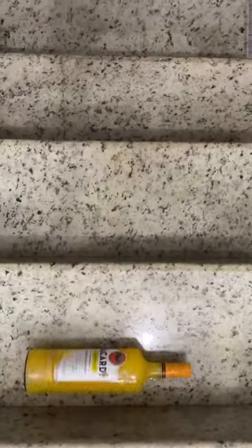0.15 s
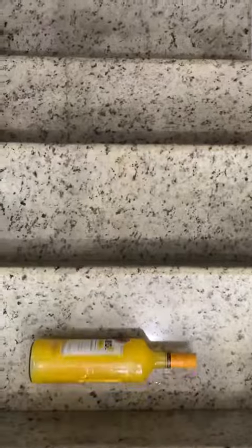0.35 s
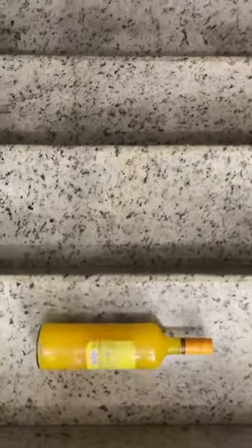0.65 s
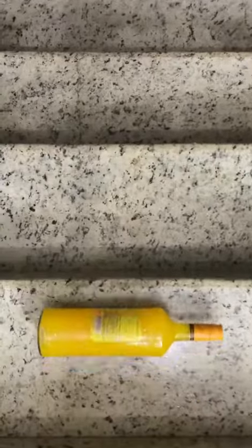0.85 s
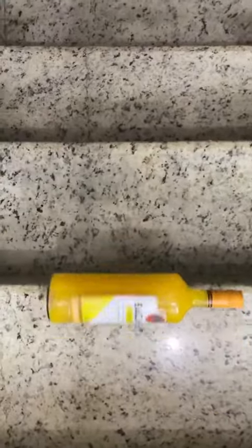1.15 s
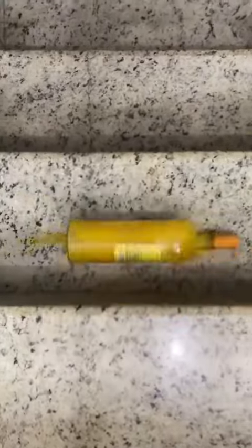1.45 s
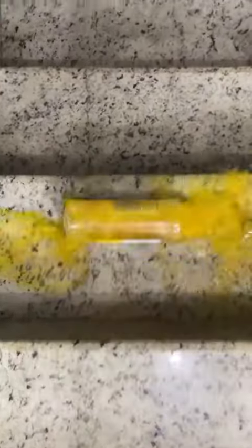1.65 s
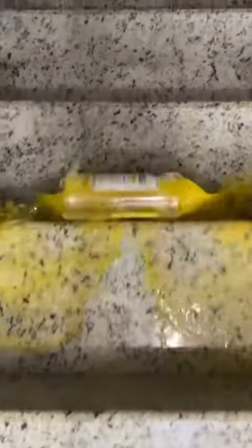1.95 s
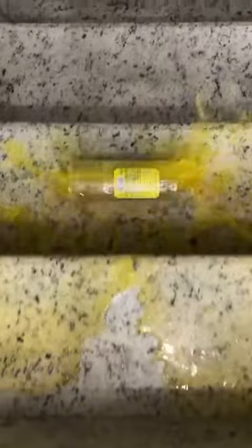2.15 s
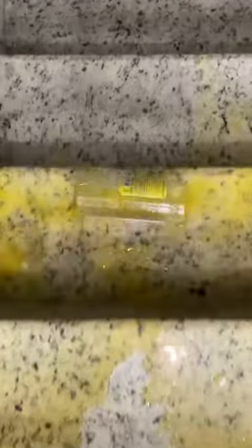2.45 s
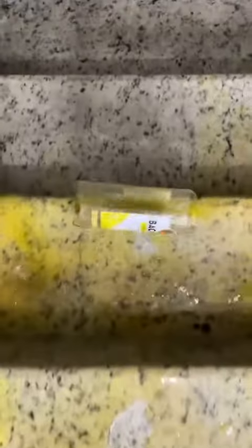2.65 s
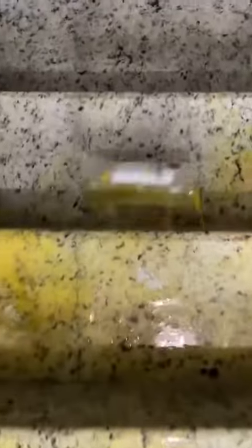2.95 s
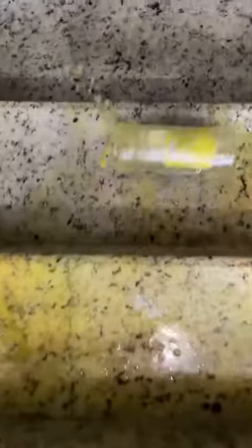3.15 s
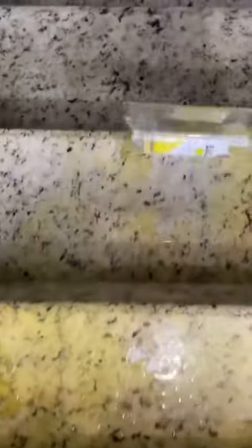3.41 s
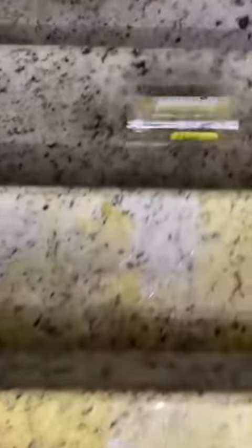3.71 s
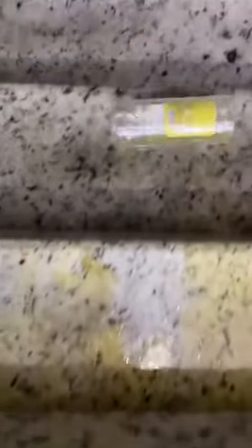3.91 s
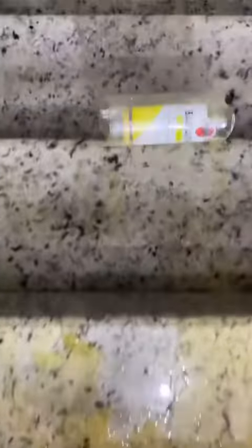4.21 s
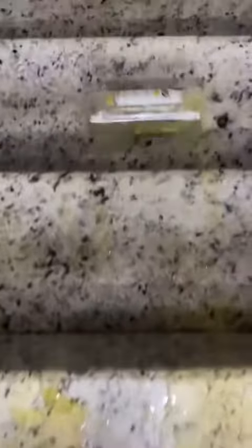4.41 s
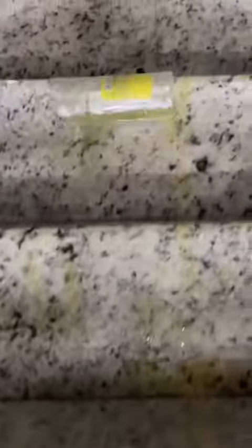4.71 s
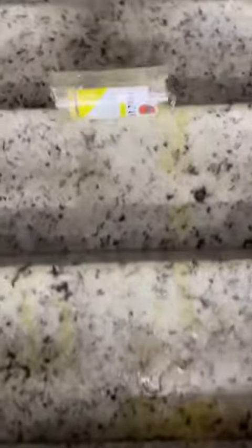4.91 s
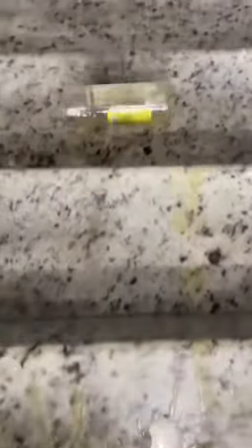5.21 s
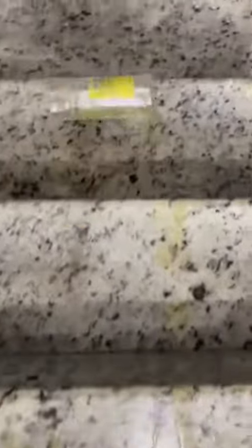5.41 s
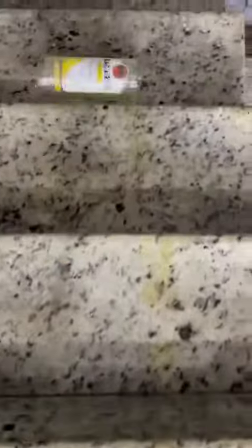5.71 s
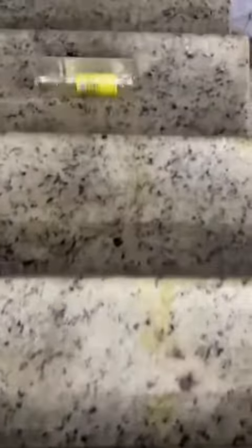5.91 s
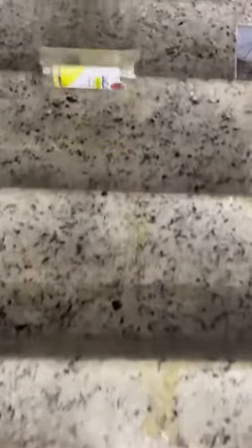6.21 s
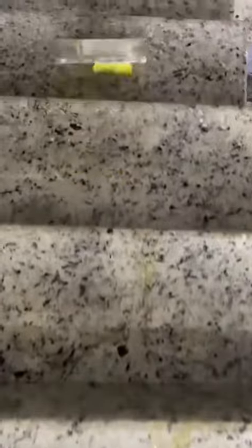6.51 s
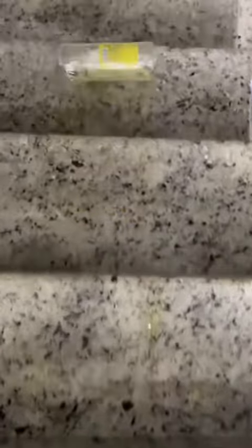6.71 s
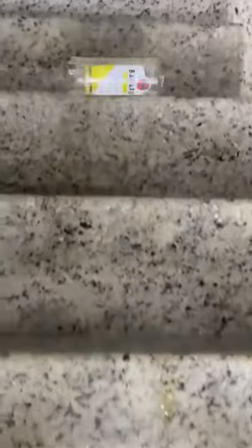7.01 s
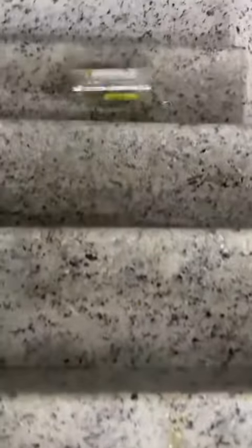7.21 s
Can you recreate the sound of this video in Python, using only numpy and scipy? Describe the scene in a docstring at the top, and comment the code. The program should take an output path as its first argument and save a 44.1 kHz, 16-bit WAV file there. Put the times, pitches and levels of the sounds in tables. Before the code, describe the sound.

Soft rolling of a filled bottle on gritty stone comes first, close to the microphone. After about a second it drops and smashes, a dense damped crack with a liquid surge and splatter. Glass bits tinkle, then the hollow remainder strikes steps roughly every seven tenths of a second, with double-ended clacks, light touches and gritty scrapes. Hard stairwell walls throw back bright echoes and a faint low boom.

```python
"""A low rumble fills a stairwell while a full glass bottle drones, grinds and bumps across a stone step.
It smashes in filtered noise bursts; juice gulps as a falling pulse and spatters as dense grains.
The broken neck and loose shards tick and ring high. The emptied body drops from step to step, end after
end, each blow a noise crack with brief wall modes and a hollow air note. Echoes and low modes ring on."""
import sys
import numpy as np
from scipy import signal
from scipy.fft import rfft, irfft, next_fast_len
from scipy.io import wavfile

SR = 44100
rng = np.random.default_rng(int(sys.argv[2]) if len(sys.argv) > 2 else 0)


def waveform_to_disk(signal):
    """Save audio, clipped to [-1, 1], as 16-bit WAV at the path in sys.argv[1]."""
    frames = np.transpose(np.atleast_2d(signal))
    scaled = np.clip(frames, -1, 1) * 32767
    samples = np.round(scaled).astype(np.int16)
    wavfile.write(sys.argv[1], SR, samples)


N = 324557


def gain_of(db):
    """Decibels to amplitude."""
    return 10 ** (np.asarray(db) / 20)


def evened(x):
    """Scales to rms 1."""
    return x / np.sqrt(np.mean(x ** 2) + 1e-20)


def read(points, hz):
    """Reads a table's second column on a log-frequency axis."""
    f, value = np.transpose(points)
    return np.interp(np.log(hz + 1), np.log(f + 1), value)


def add(mix, s, sound):
    """Mixes a sound in at time s, cutting it off at the end of the mix."""
    part = mix[max(round(s * SR), 0):][:len(sound)]
    part += sound[:len(part)]


def coloured(x, spectrum, tilt_db=0):
    """Gives x a spectrum, tilted by dB per octave, at rms 1; nothing rings ahead of its cause."""
    size = next_fast_len(len(x))
    hz = abs(np.fft.fftfreq(size, 1 / SR))
    octaves = np.log2(np.maximum(hz, 400) / 2000)  # the tilt pivots at 2 kHz and stops below 400 Hz
    db = read(spectrum, hz) + tilt_db * octaves
    # minimum phase: the phase follows from the log gain
    causal = np.exp(np.conj(signal.hilbert(np.log(gain_of(db)))))
    shaped = irfft(rfft(x, size) * causal[:size // 2 + 1], size)
    return evened(shaped[:len(x)])


def ring(t, hz, t60):
    """One mode, dying by 60 dB in t60 seconds."""
    return np.sin(2 * np.pi * hz * t) * np.exp(-np.log(1000) * t / t60)


def rings(t, modes):
    """All the modes of one object, struck together."""
    return sum(gain_of(db) * ring(t, hz, t60) for hz, db, t60 in modes)


def crack(t, decay, spectrum, tilt_db=0, evenness=0.69):
    """Glass chattering for a few milliseconds; a longer contact carries more energy."""
    shape = (1 - np.exp(-t / 0.0003)) * np.exp(-(t / decay) ** 0.66)
    chatter = rfft(rng.standard_normal(len(t)) * shape)
    # many tiny contacts excite most pitches alike
    even = irfft(chatter / (abs(chatter) + 1e-12) ** min(evenness, 1), len(t))
    burst = coloured(even * np.sqrt(shape), spectrum, tilt_db)
    return burst * np.linalg.norm(shape) / np.linalg.norm(burst)


def grains(spectrum, per_s, spread_db):
    """A dense stream of tiny impacts of uneven size, at rms 1."""
    size = gain_of(spread_db * np.minimum(rng.exponential(1, N), 4))
    sign = rng.choice([-1, 1], N)
    strikes = rng.random(N) < per_s / SR
    return coloured(size * sign * strikes, spectrum)


def strokes(rows, rise, fall):
    """Gain at every sample from rows of (start_s, length_s, level_db): each swells, holds and dies away."""
    t, power = np.arange(N) / SR, np.zeros(N)
    for s, length, db in rows:
        swell = np.clip((t - s) / rise, 0, 1)
        release = np.exp(-np.maximum(t - s - length, 0) / fall)
        power += (gain_of(db) * swell * release) ** 2
    return np.sqrt(power)


# spectrum of the stairwell's steady rumble: pitch_hz, relative level_db
RUMBLE_SPECTRUM = [(20, -20.5), (50, 4), (100, 2.5), (160, -6), (350, -15.5), (700, -18.5), (1500, -26),
                   (3000, -29), (6000, -36), (10000, -43)]


def rumble():
    """Steady noise of the air in the stairwell, weighted to the lows."""
    return gain_of(-55.5) * coloured(rng.standard_normal(N), RUMBLE_SPECTRUM)


# how long the bare walls ring in each band: pitch_hz, t60_s
WALL_DECAY = [(80, 1.57), (300, 1.67), (730, 0.88), (1500, 1.106), (3000, 0.99), (6000, 0.94),
              (10000, 0.77)]


def echoes(early_db=-2, late_db=-5.0, early_t60=0.36):
    """Response at one place: near walls and steps answer quickly; the shaft above and below rings on."""
    t = np.arange(5 * SR // 4) / SR
    # early: about 2500 sparse reflections per second
    taps = rng.choice([-1., 1.], len(t)) * (rng.random(len(t)) < 2500 / SR)
    early = taps * (1 - np.exp(-t / 0.0015)) * np.exp(-np.log(1000) * t / early_t60)
    # late: noise with a decay of its own in every band
    hz, age, z = signal.stft(rng.standard_normal(len(t)), SR, nperseg=256)
    decay = np.exp(-np.log(1000) * age / read(WALL_DECAY, hz)[:, None])
    late = signal.istft(z * decay, SR, nperseg=256)[1][:len(t)]
    late = late * (1 - np.exp(-t / 0.0099))
    return gain_of(early_db) * early / np.linalg.norm(early) + gain_of(late_db) * late / np.linalg.norm(late)


def stairwell(x, count=11):
    """The bottle moves down the stairs, so each stretch of its path has echoes of its own."""
    out, place = x.copy(), np.arange(N) / N * (count - 1)
    for k in range(count):
        near = np.flatnonzero(abs(place - k) < 1)
        share = np.cos(np.pi / 2 * (place[near] - k))  # crossfade between neighbouring places
        add(out, near[0] / SR, signal.fftconvolve(x[near] * share, echoes()))
    return out


# low modes of the stairwell: pitch_hz (before scatter), relative level_db, build_up_s, t60_s
BOOM_MODES = [(52.3, -6, 0.15, 3), (72.6, 1.5, 0.18, 1.78), (102.2, -3.5, 0.0074, 1.72),
              (133.8, -4.5, .005, 0.49)]


def boom(scatter=0.024):
    """After each landing the stairwell's low modes build up and die away, a little different every time."""
    out, t = np.zeros(N), np.arange(3 * SR // 2) / SR
    for s, *_, boom_db in LANDINGS:
        for (hz, db, build, t60), chance in zip(BOOM_MODES, rng.standard_normal(len(BOOM_MODES))):
            mode = ring(t, hz * (1 + scatter * chance), t60) * (1 - np.exp(-t / build))
            add(out, s, gain_of(boom_db + db) * mode)
    return out


# low drone and faint singing of the full bottle's glass: pitch_hz, relative level_db
DRONE_SPECTRUM = [(100, -9.5), (370, 1), (600, -5.5), (1100, -10), (1280, -10), (1400, 0), (1540, -14),
                  (1710, -3.5), (1900, -12.5), (5000, -16), (10000, -50)]
# glass grinding over grit; also colours the scrapes and the hiss before a blow: pitch_hz, relative level_db
GRIT_SPECTRUM = [(150, -8), (500, 3.5), (1400, -2), (2800, 7.5), (4500, 9), (6200, 6.5), (7200, -4.5),
                 (9300, 4.5), (11000, -42)]
# it grinds harder once every half turn: start_s, length_s, relative level_db
HALF_TURNS = [(-.03, 0.16, -52), (.40, 0.31, -66), (.80, 0.3, -62)]
TURN_RISE_S, TURN_FALL_S, ROLLING_DB = 0.033, 0.1, -68
TIP_OVER_S = 1.17  # it tips over the edge


def rolling(drone_db=-5, grit_db=-15, leave_s=.02):
    """The full bottle drones and grinds across the top step until it tips over the edge."""
    on_step = np.clip((TIP_OVER_S - np.arange(N) / SR) / leave_s, 0, 1)
    weight = np.hypot(gain_of(ROLLING_DB), strokes(HALF_TURNS, TURN_RISE_S, TURN_FALL_S))
    drone = gain_of(drone_db) * grains(DRONE_SPECTRUM, per_s=6400, spread_db=-1.5)
    grit = gain_of(grit_db) * grains(GRIT_SPECTRUM, per_s=4000, spread_db=-2)
    return weight * on_step * (drone + grit)


# spectrum of the full bottle bumping: pitch_hz, relative level_db
BUMP_SPECTRUM = [(100, 11), (400, -9.5), (700, 7), (1300, 5.5), (2200, -12.5), (5000, -44), (10000, -39)]
# bumps on the top step: start_s, relative drone level_db, drone pitch_hz, knock level_db
BUMPS = [(0.416, -53.5, 456, -48), (.440, -53, 450, -73), (.490, -52, 466, -72), (0.826, -51, 348, -55),
         (0.854, -51, 368, -48), (0.9403, -44.5, 372, -37)]


def bumps():
    """The heavy bottle bumps along its seam: a short low hum and a knock."""
    out, t = np.zeros(N), np.arange(SR // 5) / SR
    for s, drone_db, hz, knock_db in BUMPS:
        hum = ring(t, hz, 0.08) * (1 - np.exp(-t / 0.0018))
        add(out, s, gain_of(drone_db + 8) * hum + gain_of(knock_db) * crack(t, 0.0072, BUMP_SPECTRUM))
    return out


# low modes of a thud: pitch_hz, relative level_db, t60_s
THUD_MODES = [(71.7, 1, .6), (122.5, -4, .8), (178.7, -6, 1.1), (231.2, -11, 0.41)]
# dull thuds, fading as the juice runs out of the bottle: start_s, level_db
THUDS = [(1.227, -35.5), (1.543, -35), (1.850, -38), (2.757, -42.5)]


def thuds():
    """The bottle thuds on the first steps: low modes with a soft onset."""
    out, t = np.zeros(N), np.arange(SR) / SR
    for s, db in THUDS:
        add(out, s, gain_of(db) * rings(t, THUD_MODES) * (1 - np.exp(-t / 0.0016)))
    return out


# spectrum of the spattering juice: pitch_hz, relative level_db
SPRAY_SPECTRUM = [(100, -0.5), (200, 0), (400, -3.5), (1000, -1), (2000, 4.5), (3000, 6), (6000, -2),
                  (7200, -10), (9500, -11), (11000, -62.5)]
# juice pouring out: start_s, length_s, level_db
GUSHES = [(1.25, 0.35, -43.5), (1.47, 0.19, -39), (1.68, 0.36, -44.5), (2.25, 0.04, -41)]
GUSH_RISE_S, GUSH_FALL_S = 0.055, .03


def splashing():
    """Gushes of juice pour out and spatter: a dense stream of tiny drops."""
    drops = grains(SPRAY_SPECTRUM, per_s=2700, spread_db=2.0)
    return strokes(GUSHES, GUSH_RISE_S, GUSH_FALL_S) * drops


def gulp(s=1.223, db=-17, start_hz=420, end_hz=100, glide=0.0054, decay=0.0048):
    """As the glass gives way the juice surges out: one low pulse of falling pitch."""
    out, t = np.zeros(N), np.arange(SR // 8) / SR
    hz = end_hz + (start_hz - end_hz) * np.exp(-t / glide)
    pulse = t / decay * np.exp(1 - t / decay)  # peaks at 1 after one decay time
    add(out, s, gain_of(db) * np.sin(2 * np.pi * np.cumsum(hz) / SR) * pulse)
    return out


# the emptied bottle grinding over grit on the treads: start_s, length_s, relative level_db
SCRAPES = [(2.44, 0.23, -40), (2.65, 0.069, -33), (3.02, 0.36, -43), (3.90, 0.26, -53), (4.26, 0.31, -47),
           (4.81, .07, -53), (5.99, 0.082, -48), (6.10, .12, -54), (6.84, 0.07, -45.5)]
SCRAPE_RISE_S, SCRAPE_FALL_S = 0.021, 0.018


def scraping():
    """The emptied bottle drags over grit: a dense stream of tiny impacts."""
    grit = grains(GRIT_SPECTRUM, per_s=3200, spread_db=-3)
    return gain_of(-4) * strokes(SCRAPES, SCRAPE_RISE_S, SCRAPE_FALL_S) * grit


# small piece of glass ticking on stone: pitch_hz, relative level_db
TICK_SPECTRUM = [(100, -40.5), (700, -46.5), (1400, -9), (2500, 1), (4400, 4), (6200, 4.5), (7000, -6),
                 (9000, -11), (10500, -37.5)]
# ringing of the broken neck: pitch_hz, relative level_db, t60_s
NECK_MODES = [(6265, 1, 0.047), (6272, -25, 0.3), (4550, -5.5, 0.012), (2840, -12, 0.011)]
# the neck bouncing away: start_s, tick level_db, relative ring level_db
NECK_HITS = [(1.8320, -27, -19), (2.1582, -10, -19.5), (2.1710, -26, -25.5), (2.1865, -16, -27),
             (2.2770, -27.5, -39)]
# loose shards clinking: start_s, level_db, pitch_hz
SHARD_CLINKS = [(1.5569, -24, 5280), (1.563, -30, 5830), (1.642, -36.5, 9340), (1.7, -33, 8600),
                (2.905, -23, 5740), (2.938, -21, 5850), (2.955, -28.5, 5200)]


def pieces():
    """The neck and small shards: a sharp tick and a high ring."""
    out, t = np.zeros(N), np.arange(SR // 3) / SR
    for s, tick_db, ring_db in NECK_HITS:
        tick = gain_of(tick_db) * crack(t, 0.0015, TICK_SPECTRUM)
        add(out, s, gain_of(ring_db + 2.5) * rings(t, NECK_MODES) + tick)
    for s, db, hz in SHARD_CLINKS:
        clink = gain_of(3) * ring(t, hz, 0.027) + crack(t, 0.0022, TICK_SPECTRUM)
        add(out, s, gain_of(db) * clink)
    return out


# spectrum of the bursting glass: pitch_hz, relative level_db
BURST_SPECTRUM = [(100, -27), (600, -22.5), (850, -10.5), (1200, -15.5), (1800, -6.5), (2100, -10.5),
                  (2700, -2.5), (3250, -0.5), (3700, -3.5), (6000, -9.5), (7000, -18), (9500, -23)]
# noise bursts of the smash, a faint one leading in: start_s, level_db, decay_s
SMASH_BURSTS = [(1.2062, -38, 0.0055), (1.2105, -24.5, 0.014), (1.2144, -10.5, 0.0096),
                (1.2216, -18.5, 0.0042)]


def smash():
    """The full bottle bursts in a few noise bursts, a faint one leading in; the juice damps all ringing."""
    out, t = np.zeros(N), np.arange(SR // 4) / SR
    for s, db, decay in SMASH_BURSTS:
        add(out, s, gain_of(db) * crack(t, decay, BURST_SPECTRUM))
    return out


def lead_in(length=.014, rise=0.0057):
    """A faint hiss swells for 14 ms and stops as each blow begins."""
    t = np.arange(int(length * SR)) / SR
    return coloured(rng.standard_normal(len(t)), GRIT_SPECTRUM) * np.exp((t - length) / rise)


# the bottle lands on a step, one end and then the other: start_s, first end relative level_db,
# second end delay_s, second end relative level_db, contact decay_s, relative hollow level_db,
# first end's hollow pitch_hz, relative upper hollow level_db, first end's upper pitch_hz,
# relative stairwell boom level_db
LANDINGS = [(1.837, -19.5, 0.0093, -15, .008, 1, 704, -6, 1430, -43),
            (2.7326, -11.5, .0245, -12, 0.0038, -5, 800, -4.5, 1250, -38),
            (2.9014, -20, 0.011, -23.5, 0.0033, -3, 746, -8.5, 1350, -37.5),
            (3.4132, -17.5, 0.022, -13, 0.0062, 7.5, 810, -2.5, 1430, -34.5),
            (4.1429, -13, 0.01, -17.5, 0.0075, 4, 742, -2.5, 1440, -41.5),
            (4.8869, -12.5, 0.0096, -14.5, 0.0053, 4, 724, -10, 1560, -42),
            (5.5804, -13, .0084, -29.5, 0.0084, 4.5, 743, -1.5, 1416, -39),
            (6.2271, -19, .0048, -12.5, 0.0068, 1, 763, -14, 1367, -42),
            (6.9280, -16.5, 0.016, -12.5, 0.0047, -2.5, 833, -19, 1420, -41)]
SECOND_END_PITCH = 0.917  # the second end sounds the hollow notes a little lower
# light touches of one end between landings, and at 2.3965 s a small clink given the same sound: start_s,
# relative level_db, contact decay_s, tilt_db per octave
TOUCHES = [(1.890, -25, 0.019, -0.5), (2.285, -37.5, 0.0061, -4.5), (2.3965, -31, .003, -.5),
           (3.194, -24.5, .006, -4), (3.7746, -33, .002, 7.5), (6.370, -28, 0.0053, -2),
           (6.9233, -23, 0.0079, 4.5)]
TOUCH_HOLLOW_DB, TOUCH_HZ = -0.5, 708
TOUCH_OVERTONE_DB, TOUCH_OVERTONE_HZ = -13, 1173  # level relative, as in the landings


def blows(first_tilt_db=-.5, second_tilt_db=-0.8):
    """Every blow: two for a landing, one for each touch or clink in TOUCHES."""
    rows = []
    for s, first_db, gap, second_db, decay, hollow_db, hz, upper_db, upper_hz, _ in LANDINGS:
        first_end = (s, first_db, 1, first_tilt_db)
        second_end = (s + gap, second_db, SECOND_END_PITCH, second_tilt_db)
        for at, db, pitch, tilt_db in (first_end, second_end):
            rows.append((at, db, decay, hollow_db, hz * pitch, upper_db, upper_hz * pitch, tilt_db))
    for s, db, decay, tilt_db in TOUCHES:
        rows.append((s, db, decay, TOUCH_HOLLOW_DB, TOUCH_HZ, TOUCH_OVERTONE_DB, TOUCH_OVERTONE_HZ, tilt_db))
    return rows


# glass walls, quickly damped by the stone and the wet label: pitch_hz and relative level_db
# (both before scatter), t60_s
WALL_MODES = [(1365, -20, .028), (2080, -22, .02), (2390, -21, .03), (2700, -12, .028), (3560, -25, .025),
              (4320, -21, .06), (5330, -20, .025), (6860, -23, .02), (7752, -22, .12)]


def glass_walls(t):
    """The bottle's wall modes, each blow stirring them with slightly different levels, signs and pitches."""
    out = np.zeros(len(t))
    for hz, db, t60 in WALL_MODES:
        a, b = rng.standard_normal(2)
        out += np.sign(a) * gain_of(db + a) * ring(t, hz * (1 + 0.001 * b), t60)
    return out


# spectrum of glass clacking on stone: pitch_hz, relative level_db
CLACK_SPECTRUM = [(100, -14), (300, -12.5), (500, -6), (800, -0.5), (1100, -5), (1800, -1.5), (2800, 2.5),
                  (4000, 0), (6200, 1), (6900, -10), (9300, -4), (10500, -33.5)]


def bottle(lead_in_db=-20, hollow_t60=0.034):
    """Each blow gives a crack with a brief ring of the walls, and a hollow note from the air inside."""
    out, hollow, t = np.zeros(N), np.zeros(N), np.arange(SR // 7) / SR
    swell = 1 - np.exp(-t / 0.0015)  # the air takes a cycle to get going
    for s, db, decay, hollow_db, hollow_hz, overtone_db, overtone_hz, tilt_db in blows():
        lower = gain_of(hollow_db) * ring(t, hollow_hz, hollow_t60)
        upper = gain_of(overtone_db + 9.5) * ring(t, overtone_hz, .014)
        add(hollow, s, gain_of(db - 0.5) * (lower + upper) * swell)
        blow = crack(t, decay, CLACK_SPECTRUM, tilt_db) + gain_of(-3.5) * glass_walls(t)
        add(out, s, gain_of(db + 2) * blow)
        hiss = lead_in()
        add(out, s - len(hiss) / SR, gain_of(db + lead_in_db) * hiss)  # ends as the blow begins
    return out, hollow


def scene(gulp_wet=0.29, hollow_wet=0.9):
    """All sources in the stairwell, over its low steady rumble."""
    surge = gulp()
    clacks, hollow = bottle()
    sources = rolling() + bumps() + thuds() + splashing() + scraping() + pieces() + smash() + clacks
    # only a share of the low pulse and of the hollow note stirs the walls; the rest stays direct
    direct = (1 - gulp_wet) * surge + (1 - hollow_wet) * hollow
    echoing = stairwell(sources + gulp_wet * surge + hollow_wet * hollow)
    return (echoing + direct + boom() + rumble())[None]


BAND_LIMIT_HZ = 10350


def record(dry):
    """The microphone rounds off the highest peaks; then the band limit takes off the top."""
    rounded = np.tanh(dry)
    lowpass = signal.firwin(255, BAND_LIMIT_HZ, window=("kaiser", 9), fs=SR)
    return signal.oaconvolve(rounded, lowpass[None], "same")


dry = scene()
out = record(dry)
waveform_to_disk(out)
```